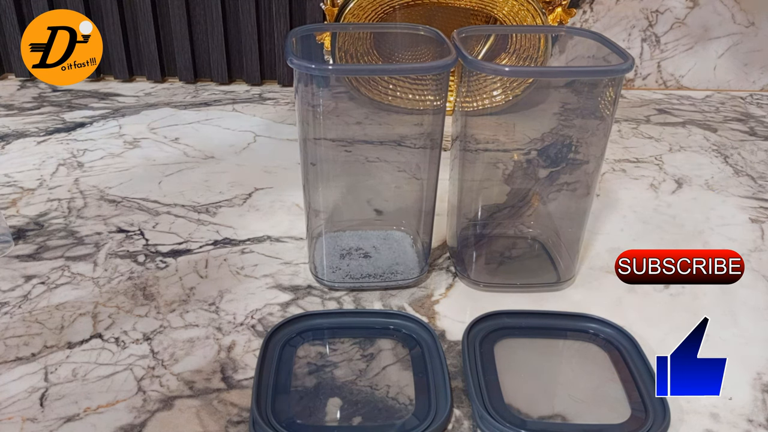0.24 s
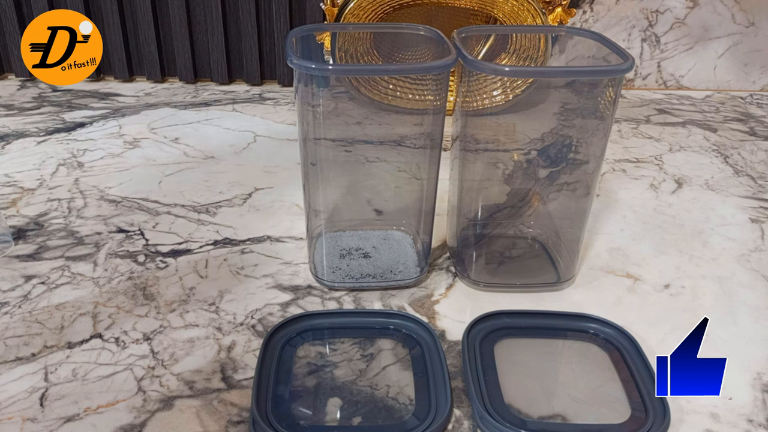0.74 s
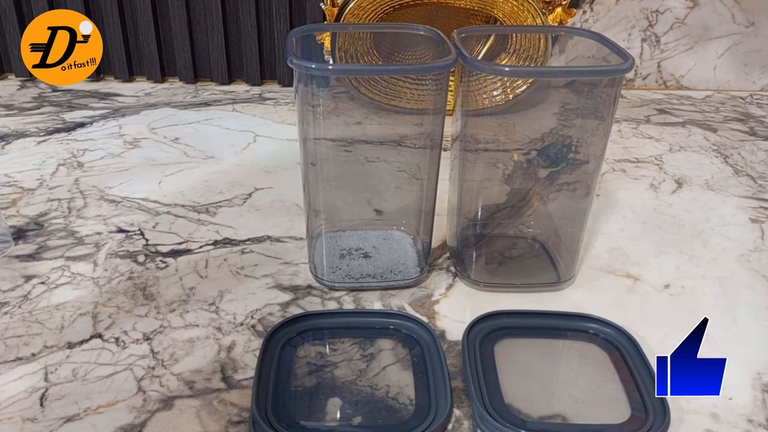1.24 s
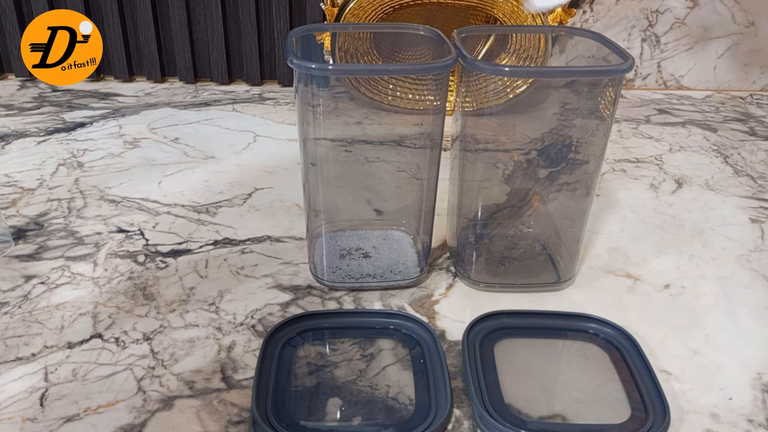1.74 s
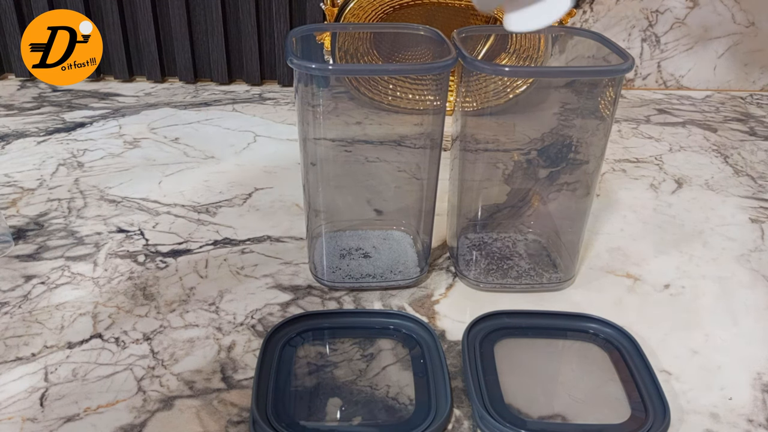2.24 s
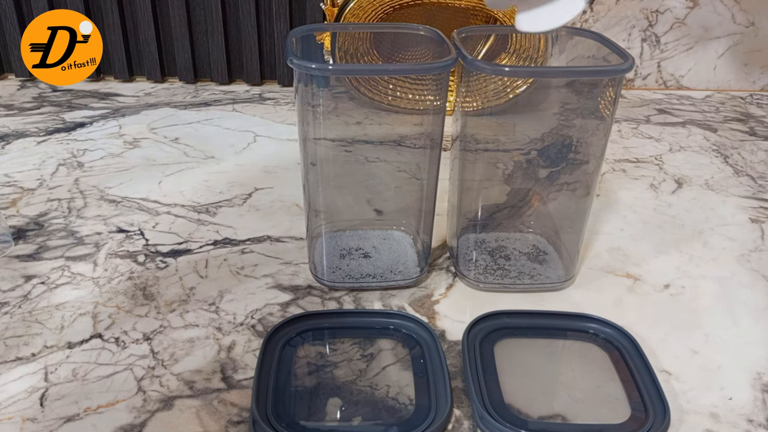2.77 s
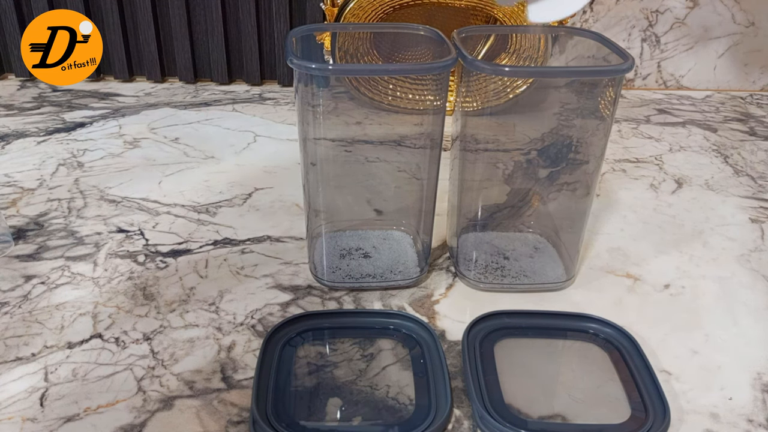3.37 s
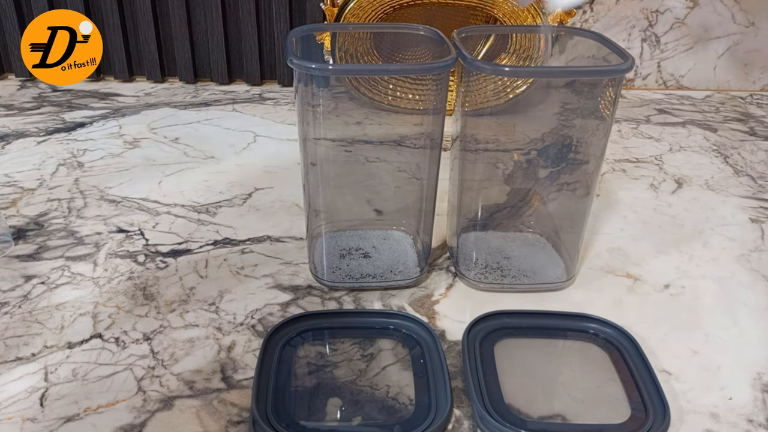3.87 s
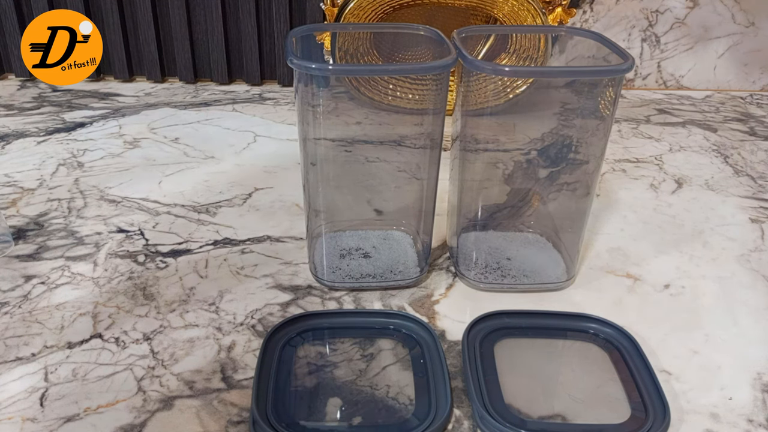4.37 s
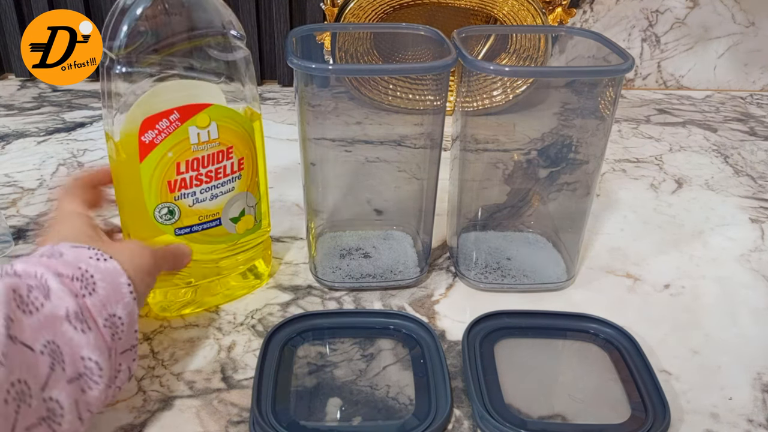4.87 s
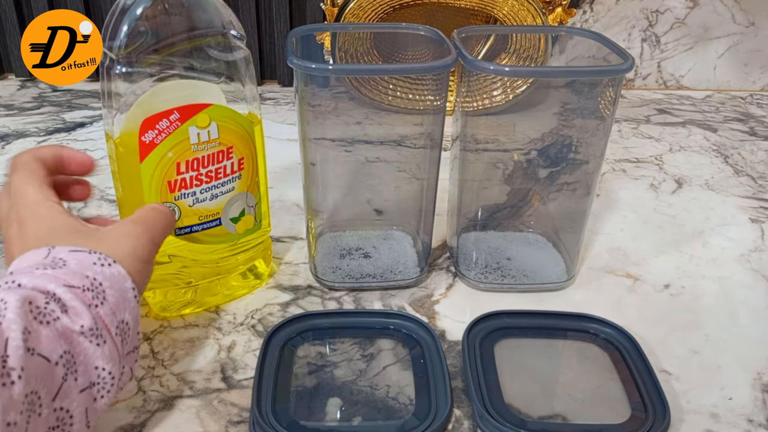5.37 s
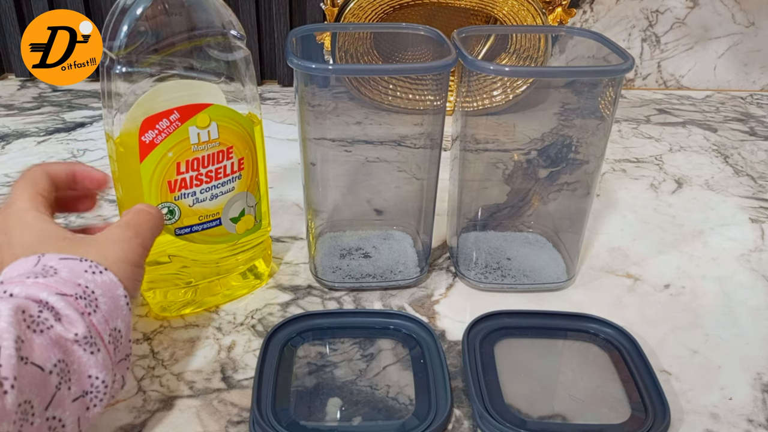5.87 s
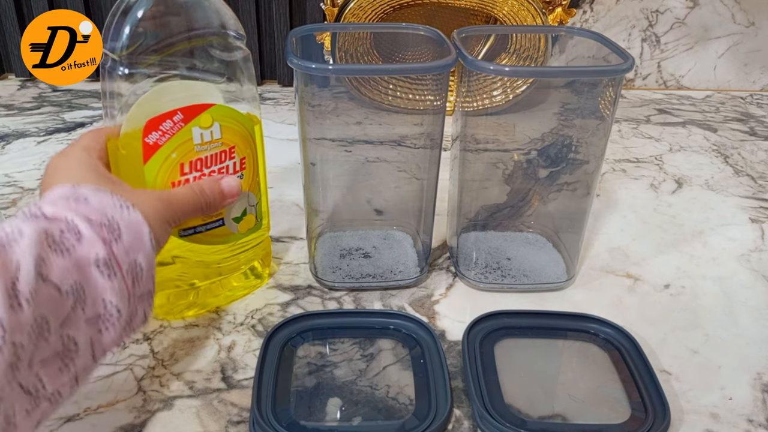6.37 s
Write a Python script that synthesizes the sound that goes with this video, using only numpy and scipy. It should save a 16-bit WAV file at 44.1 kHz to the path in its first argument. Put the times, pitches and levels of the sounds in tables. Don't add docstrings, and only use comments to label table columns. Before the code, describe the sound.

Powder whispers inside a tilted shaker, then comes a run of about ten crisp shakes a second, each a sandy hiss with a hollow plastic patter, slowing and fading to a trickle. After an abrupt tiny gap, cloth swishes close by and irregular finger taps rattle the thin wall of a liquid-filled bottle, with low soft thuds. Close, dry, mono pickup indoors over faint room tone.

```python
import sys
import numpy as np
from scipy import signal
from scipy.fft import rfft, irfft
from scipy.io import wavfile
from scipy.ndimage import uniform_filter1d

SR = 44100
rng = np.random.default_rng(int(sys.argv[2]) if len(sys.argv) > 2 else 0)


def gain_from_decibels(decibels):
    exponent = np.asarray(decibels, float) / 20
    return 10 ** exponent


def unload_audio(sound):
    columns = np.transpose(np.atleast_2d(sound))
    steps = np.round(np.clip(columns, -1, 1) * 32767)
    wavfile.write(sys.argv[1], SR, steps.astype(np.int16))


N = 291942
TIME = np.arange(N) / SR
CUT_S = 4.5

# (time [s], patter peak [dB], leading clump over stream [dB], fall [ms])
SHAKES = [(0.063, -34.5, -7, 43), (1.292, -42.5, 3, 25), (1.443, -40, 2, 30), (1.486, -28, 4, 24),
          (1.584, -30, -2, 53), (1.685, -26.5, 4.5, 34), (1.781, -26, 4.5, 30.5), (1.887, -27.5, -0.5, 44),
          (1.999, -28.5, 1, 70), (2.098, -30, 4, 98), (2.202, -31, 2.5, 68), (2.314, -33, 2.5, 58),
          (2.489, -31, -8, 68), (2.546, -32.5, -3, 22), (2.648, -36.5, 9.5, 114), (2.786, -40, 0, 29),
          (2.892, -36.5, 9.5, 74), (2.97, -35.5, 4.5, 23), (2.987, -37, 3, 59), (3.093, -35, -9, 47),
          (3.218, -39.5, -2, 70), (3.338, -39.5, 5, 53), (3.43, -34.5, -7, 30), (3.554, -39, 1, 61),
          (3.649, -41, 7, 81), (3.701, -48, -3, 52), (3.772, -39.5, 4, 32), (3.885, -39.5, 2, 37),
          (3.989, -42, -10, 37), (4.064, -48.5, 9.5, 19)]
# (frequency [Hz], density [dB per Hz])
HISS = [(880, -60), (1500, -24.5), (1650, -19), (2540, -12), (3030, -12.5), (3720, -9), (4570, -19),
        (4990, -11), (6070, -2.5), (7380, -4.5), (7980, -7.5), (9790, -1), (11300, -3), (13500, -19.5),
        (15500, -13)]
# (frequency [Hz], level [dB], t60 [s])
DEEP = [(89.3, -14.5, 0.98), (105.5, 0.5, 0.33), (126, -12, 0.38)]
# (frequency [Hz], level [dB], t60 [s])
BODY = [(189.6, 4, 0.25), (220.5, 3, 0.24), (266, -13.5, 0.39), (331.5, 2.5, 0.14), (450, -13, 0.29)]


def level(x, db):
    return x * gain_from_decibels(db) / np.sqrt(np.mean(x ** 2))


def colour(x, points):
    hz, db = np.transpose(points)
    log_hz = np.log(np.fft.rfftfreq(4096, 1 / SR) + 1)
    log_gain = np.interp(log_hz, np.log(hz), db) * np.log(10) / 20
    cepstrum = irfft(log_gain)
    cepstrum[1:2048] *= 2
    cepstrum[2049:] = 0
    response = irfft(np.exp(rfft(cepstrum)))
    return signal.fftconvolve(x, response)[:len(x)]


def band(x, lo_hz, hi_hz):
    sos = signal.butter(4, [lo_hz, hi_hz], "band", fs=SR, output="sos")
    return np.std(signal.sosfilt(sos, x))


def resonate(x, hz, width_hz):
    return signal.lfilter(*signal.iirpeak(hz, hz / width_hz, SR), x)


def ring(modes, gains, turns, t):
    hz, db, t60 = np.transpose(modes)[:, :, None]
    decay = gain_from_decibels(db - 60 * t / t60)
    sines = np.sin(2 * np.pi * (hz * t + turns[:, None]))
    return (gains[:, None] * decay * sines).sum(0)


def add(out, s, x):
    i = int(s * SR)
    out[i:i + len(x)] += x[:N - i]


def walk(rate):
    k = int(SR / rate)
    held = np.repeat(rng.standard_normal(N // k + 1), k)
    return 1.94 * uniform_filter1d(uniform_filter1d(held, k), k)[:N]


def flicker():
    rate = 16
    levels_db = 3 * rng.standard_normal(int(N / SR * rate) + 2)
    return gain_from_decibels(np.interp(TIME * rate, np.arange(len(levels_db)), levels_db))


def swells(rows):
    drop_db, shape = 13.5, 1.72
    total = np.zeros(N)
    for s, db, rise, fall in rows:
        away = np.abs((TIME - s) / np.where(TIME < s, rise, fall))
        total = total + gain_from_decibels(2 * (db - drop_db * away ** shape))
    return total


def grains(rate, spread_db):
    size = gain_from_decibels(spread_db * np.minimum(rng.exponential(size=N), 3)) * rng.standard_normal(N)
    return level(size * (rng.random(N) < rate / SR), 0)


def air():
    # (frequency [Hz], density [dB per Hz])
    tone = [(15, -83), (25, -17), (87, 3.5), (215, -1), (245, -2.5), (544, -8), (619, -8), (675, -8),
            (768, -10.5), (874, -14), (3180, -18), (4300, -34.5), (5590, -55), (9460, -120)]
    sway_db = 1.2 * walk(6)
    return level(colour(rng.standard_normal(N), tone) * gain_from_decibels(sway_db), -64.5)


def hand():
    # (peak [s], rustle [dB], rumble [dB], rise [s], fall [s])
    moves = [
        (4.798, -63.5, -66.5, 0.32, 0.19),
        (5.24, -83, -63.5, 0.034, 0.045),
        (5.31, -81, -50.5, 0.037, 0.029),
        (5.852, -79, -59.5, 0.86, 0.31),
        (5.824, -64, -82, .06, 0.092),
        (6.5, -64.5, -51, 0.066, .1),
    ]
    # (peak [s], swish [dB], rise [s], fall [s])
    sweeps = [
        (4.8, -67.5, 0.34, 0.12),
        (6.48, -75, 0.15, 0.24),
    ]
    # (frequency [Hz], density [dB per Hz])
    rustling = [(180, -42), (300, 2.5), (373, -8), (707, 4.5), (1360, 1.5), (1470, 1.5), (3660, -6),
                (4600, -67), (5980, -69), (10100, -120)]
    # (frequency [Hz], density [dB per Hz])
    silky = [(1760, -23), (3000, -12), (3280, -11), (3660, -4), (4350, -13), (4660, -14), (5340, -8.5),
             (5920, -5.5), (6260, -4), (8010, -15), (10900, -13), (13400, -23), (15500, -19)]
    rest_rustle, rest_rumble, rest_silk, rest_swish = gain_from_decibels(2 * np.array([-78, -71.5, -75.5, -86]))
    s, rustle_db, rumble_db, rise, fall = np.transpose(moves)
    rub = swells(zip(s, rustle_db, rise, fall))
    shake = swells(zip(s, rumble_db, rise, fall))

    silk = level(colour(rng.standard_normal(N), silky), 0)
    sound = np.sqrt(rest_silk + gain_from_decibels(2 * -9) * rub) * silk
    swish = level(colour(rng.standard_normal(N), HISS), -6)
    sound = sound + np.sqrt(rest_swish + swells(sweeps)) * swish
    t = np.arange(SR // 2) / SR
    for modes, db in ((DEEP, 0), (BODY, -3.5)):
        body = ring(modes, np.ones(len(modes)), np.zeros(len(modes)), t)
        rumble = level(signal.fftconvolve(rng.standard_normal(N), body)[:N], db)
        sound = sound + np.sqrt(rest_rumble + shake) * rumble
    rustle = colour(grains(5000, spread_db=2), rustling) * gain_from_decibels(1.5 * walk(40))
    sound = sound + np.sqrt(rest_rustle + rub) * level(rustle, 0)
    return sound * (TIME > CUT_S)


def touches():
    # (time [s], peak [dB], flesh [0 nail - 1 pad], wall ring [Hz], push on the liquid [dB])
    finger_taps = [(4.971, -51, 0.083, 494, -6), (5.368, -39.5, 0.063, 670, 0.5), (5.484, -37, .6, 650, 4),
                   (5.557, -43, 0, 710, 5), (5.722, -33.5, 0.82, 700, 0), (5.800, -38, 0.26, 700, 1.5),
                   (5.859, -36.5, 0.15, 750, -0.5), (5.983, -40.5, 1, 614, 2.5),
                   (6.035, -40.5, 0.27, 830, -9), (6.084, -34.5, 0.17, 716, 2.5),
                   (6.206, -37, 0.78, 1020, 0.5)]
    # (time [s], peak [dB], deep boom [dB], upper boom [dB])
    bumps = [
        (5.285, -61, -46, -47),
        (5.309, -70, -50, -49),
        (6.445, -55.5, -47, -69),
        (6.478, -60, -42, -69),
        (6.507, -50, -33.5, -51),
        (6.534, -58, -48, -53),
    ]
    nail, pad = np.array([-26, -4, -9.5]), np.array([-4, -13.5, -21.5])
    rows = []
    for s, db, flesh, hz, push in finger_taps:
        mix = nail + flesh * (pad - nail)
        rows.append((s, db, *(mix + [db + push, db + push, 0]), hz))
    for bump in bumps:
        rows.append((*bump, -7.5, 700))
    return rows


def wall_rattle(noise, hz, beat_hz, t):
    # (frequency [Hz], width [Hz], level [dB])
    panel = [(446, 28, 13), (490, 28, 1), (590, 23, -1.5), (630, 24, -30), (740, 38, -7), (833, 41, -0.5),
             (900, 21, -7.5), (1021, 21, 3.5), (1110, 28, 4), (1310, 14, 6), (1595, 81, 8), (2500, 85, 8)]
    # (frequency [Hz], density [dB per Hz])
    wall = [(220, -37), (380, -3), (422, -8), (718, -1.5), (952, -6), (1090, -6), (1400, -8.5),
            (1600, -8.5), (2260, -12.5), (2700, -18.5), (4600, -39), (5980, -82), (10100, -120)]
    t60_s = 0.16
    dense = noise * gain_from_decibels(-60 * t / t60_s) * (1 - np.exp(-t / 0.0011))
    dense = dense * gain_from_decibels(1.35 * np.sin(2 * np.pi * beat_hz * t))
    dense = 0.5 * dense + 1.01 * signal.lfilter(*signal.iirpeak(hz, 1.5, SR), dense)
    dense = dense + 0.97 * sum(gain_from_decibels(g) * resonate(dense, f, w) for f, w, g in panel)
    return colour(dense, wall)


def taps():
    # (frequency [Hz], level [dB], t60 [s])
    nail_modes = [(1680, -13, 0.15), (2690, 6, 0.015), (3510, -12.5, 0.061), (6200, -10, .03)]
    # (frequency [Hz], density [dB per Hz])
    sheen = [(1760, -13), (3000, 0), (3190, -6), (3640, -4), (4590, -21), (5380, -13), (6050, -4),
             (6570, -10.5), (7180, -6.5), (7850, -21.5), (10100, -11), (13300, -35), (15500, -25)]
    spot_t60_s, liquid_rise_s = 0.022, 0.0081
    out, crack, t = np.zeros(N), np.zeros(N), np.arange(SR // 3) / SR
    rows = touches()
    chance = rng.standard_normal((len(rows), 2, len(DEEP + BODY + nail_modes)))
    noises = rng.standard_normal((len(rows), len(t)))
    a, b = len(DEEP), len(DEEP + BODY)
    for (s, db, deep_db, body_db, nail_db, hz), (spread, turns), noise in zip(rows, chance, noises):
        gains = gain_from_decibels(1.85 * spread)
        deep = gain_from_decibels(deep_db) * ring(DEEP, gains[:a], turns[:a], t)
        upper = gain_from_decibels(body_db) * ring(BODY, gains[a:b], turns[a:b], t) * (1 - np.exp(-t / liquid_rise_s))
        boom = gain_from_decibels(-1.5) * (deep + upper) * (1 - np.exp(-t / 0.0058))
        spot = gain_from_decibels(db + 4.5 - 60 * t / spot_t60_s) * np.sin(2 * np.pi * hz * t) * (1 - np.exp(-t / 0.0027))
        rattle = gain_from_decibels(db + 5.5) * wall_rattle(noise, hz, 62 * gains[0] ** 0.24, t)
        nail = gain_from_decibels(db + nail_db) * ring(nail_modes, gains[b:], 0 * turns[b:], t)
        add(out, s, boom + spot + nail + rattle)
        click = noise * (np.exp(-t / 0.0015) + 0.55 * np.exp(-t / 0.034))
        add(crack, s, gain_from_decibels(db + nail_db + 7.5) * click)
    return out + colour(crack, sheen)


def ticks():
    # (time [s], bright peak [dB], knock peak [dB], knock [Hz])
    strays = [(0.8948, -54, -56, 1110), (0.9844, -70, -74, 1080), (1.0103, -55, -75, 1340),
              (1.0844, -66, -73, 775), (1.1562, -56, -69, 781), (1.291, -55, -45.5, 2560),
              (1.885, -28.5, -53, 2500), (2.1, -22.5, -39, 990), (2.8934, -33.5, -41, 2830),
              (2.9924, -45, -44, 2500), (3.2197, -33.5, -49, 3100), (3.4344, -38, -44.5, 2310),
              (3.648, -43, -46, 2690), (4.969, -58, -57, 1510)]
    out, knocks, t = np.zeros(N), np.zeros(N), np.arange(2048) / SR
    snap_filter = signal.butter(2, [700, 4000], "band", fs=SR)
    for s, db, knock_db, hz in strays:
        noise = rng.standard_normal(len(t))
        add(out, s, gain_from_decibels(db + 4.0) * noise * np.exp(-t / 0.0037))
        add(knocks, s, gain_from_decibels(knock_db - 1.0 - 60 * t / 0.061) * np.sin(2 * np.pi * hz * t))
        snap = signal.lfilter(*snap_filter, noise * np.exp(-t / 0.0017))
        add(knocks, s, gain_from_decibels(knock_db + 7.5) * snap)
    return colour(out, HISS) + knocks


def powder_flow(first_tub):
    # (time [s], patter on the tub [dB])
    stream = [(0, -42), (.03, -52), (.22, -54), (.29, -64.5), (.88, -72.5), (1.28, -75.5), (1.45, -69),
              (1.56, -53), (2.0, -58.5), (2.66, -54.5), (3.0, -58.5), (4.1, -69.5), (4.44, -64.5),
              (4.497, -48)]
    # (peak [s], hiss [dB], rise [s], fall [s])
    slides = [
        (.36, -54.5, .3, .35),
        (.69, -42.5, 0.18, 0.17),
        (.8, -49, .1, 0.077),
        (.897, -58, 0.006, .05),
        (1.12, -73, .3, 0.52),
        (1.33, -52, 0.052, 0.045),
        (1.41, -50.5, 0.035, 0.055),
        (1.54, -45, 0.11, 0.24),
        (4.2, -58, 0.44, 0.15),
        (4.48, -39, 0.13, .3),
    ]
    lead_s, spread_s = 0.022, 0.009
    s, stream_db = np.transpose(stream)
    patter = gain_from_decibels(2 * np.interp(TIME, s, stream_db))
    hiss = swells(slides) + patter * gain_from_decibels(2 * np.where(first_tub, 0.5, 8))
    ms = np.arange(SR // 2) / SR * 1000
    for s, db, clump_db, fall_ms in SHAKES:
        clump = gain_from_decibels(2 * clump_db) * np.exp(-ms / 7)
        throw = (1 - np.exp(-ms / 4)) * (np.exp(-ms / fall_ms) + clump)
        add(patter, max(s - .002, 0), throw * gain_from_decibels(2 * (db - 17.0)))
        dust = uniform_filter1d(np.pad(throw, (int(lead_s * SR), 0)), int(spread_s * SR))
        add(hiss, s - lead_s, dust * gain_from_decibels(2 * (db - 10)))
    return patter, hiss


def spout_pause():
    depth_db, ahead_s, width_s = -1, 0.015, 0.0097
    ahead = np.array(SHAKES)[:, :1] - ahead_s - np.arange(0, N, 64) / SR
    dips = np.exp(-(ahead / width_s) ** 2).sum(0)
    return np.repeat(gain_from_decibels(depth_db * dips), 64)[:N]


def grain_hiss():
    # (frequency [Hz], width [Hz], level [dB])
    rim = [(3830, 100, -6), (6030, 56, 3.5), (6510, 71, 0.5), (6900, 55, -17), (8580, 55, -1),
           (10030, 110, -18), (10300, 72, -1), (10720, 51, -0.5)]
    dust = grains(16000, spread_db=-3.0)
    rims = sum(gain_from_decibels(g) * flicker() * resonate(dust, f, w) for f, w, g in rim)
    return colour(dust + rims, HISS)


def lumps():
    return grains(400, spread_db=1)


def tub_drum(first_tub):
    # (frequency [Hz], width [Hz], level [dB])
    tub = [(750, 14, 12.5), (881, 177, 3.5), (1012, 19, -5.5), (1090, 29, -10), (1268, 130, 2.5),
           (1405, 52, -3.5), (1541, 56, 2), (1687, 167, 1), (1940, 160, 0), (2157, 50, 6), (2310, 150, 2.5),
           (2476, 38, -5.5), (2582, 82, 4), (2804, 60, 0), (2970, 106, 1.5), (3250, 130, 5),
           (3420, 40, 4.5), (3696, 25, 9), (3890, 48, 5)]
    # (frequency [Hz], density [dB per Hz])
    first_patter = [(210, -40), (350, -11), (510, 2), (647, -16), (769, -15), (1030, -3), (1250, -2.5),
                    (1450, -4.5), (1630, -3), (1820, -7), (2160, -6.5), (2990, -9), (3260, -8.5),
                    (4600, -14.5), (5980, -52), (10100, -120)]
    # (frequency [Hz], density [dB per Hz])
    second_patter = [(210, -50), (350, -4), (562, -5), (675, -17), (974, -0.5), (1410, -9.5), (1650, -0.5),
                     (1940, -5.5), (2740, -1.5), (3830, -6.5), (4600, -16.5), (5980, -1.5), (10100, -120)]
    drops = grains(6000, spread_db=2.0) + 0.31 * lumps()
    drum = .5 * drops
    for hz, width_hz, db in tub:
        drum = drum + gain_from_decibels(db) * flicker() * resonate(drops, hz, width_hz)
    return np.where(first_tub, colour(drum, first_patter), colour(drum, second_patter))


def powder():
    first_tub = np.arange(N) < 1.28 * SR
    patter, hiss = powder_flow(first_tub)
    fine, drum = grain_hiss(), tub_drum(first_tub)
    fine = fine / band(fine, 5000, 12000) * np.sqrt(hiss) * gain_from_decibels(.8 * walk(40))
    drum = drum / band(drum, 600, 3400) * np.sqrt(patter) * gain_from_decibels(1.6 * walk(55))
    return (fine + drum) * spout_pause() * (np.arange(N) < CUT_S * SR)


def scene():
    mono = air() + hand() + taps() + ticks() + powder()
    return np.array([mono, mono])


def top_cut(x):
    return signal.sosfilt(signal.butter(12, 16970, fs=SR, output="sos"), x)


def record(dry):
    back_s, fade_s, top_hz = 4.547, 0.022, 15790
    gate = np.where(TIME < CUT_S, 1, np.clip((TIME - back_s) / fade_s, 0, 1))
    heard = signal.sosfilt(signal.butter(1, 30, "high", fs=SR, output="sos"), dry) * gate
    heard = signal.sosfilt(signal.ellip(12, .2, 80, top_hz, fs=SR, output="sos"), heard)
    return top_cut(heard)


dry = scene()
out = record(dry)
unload_audio(out)
```